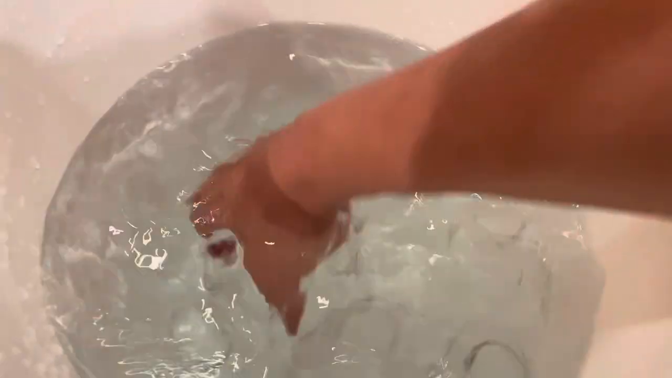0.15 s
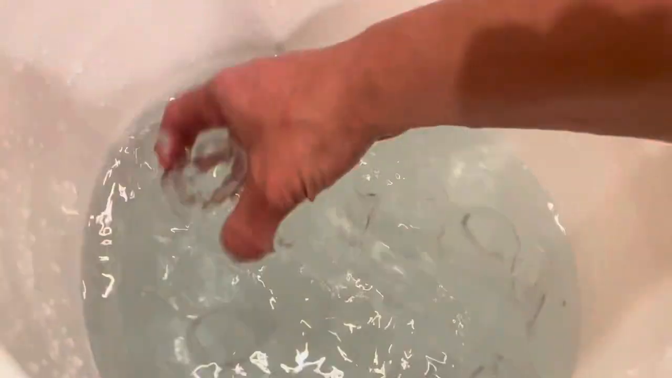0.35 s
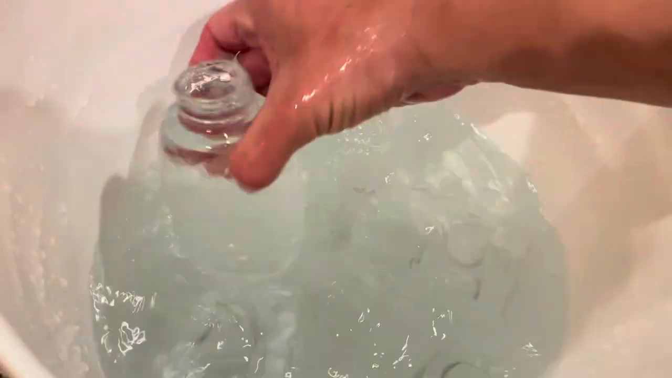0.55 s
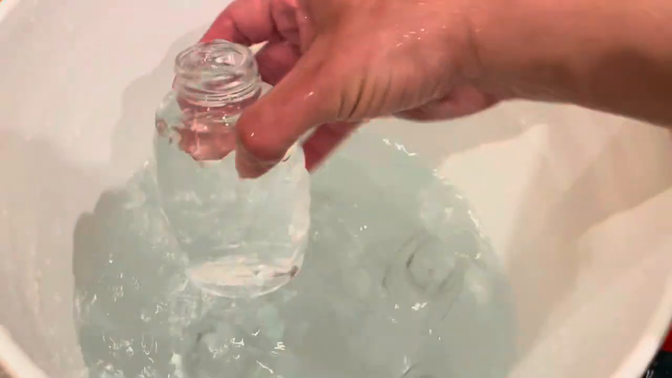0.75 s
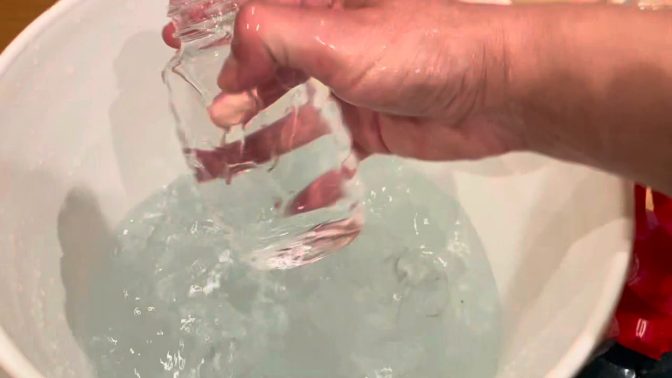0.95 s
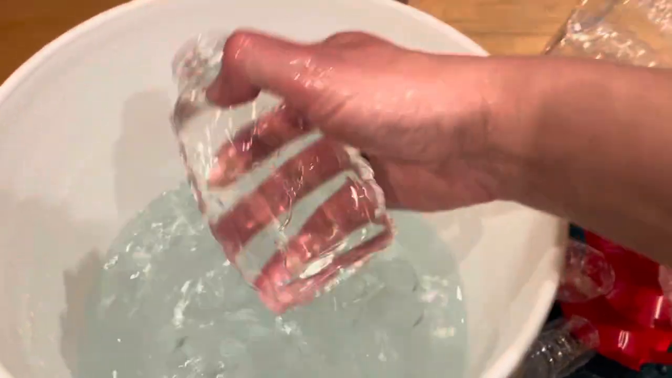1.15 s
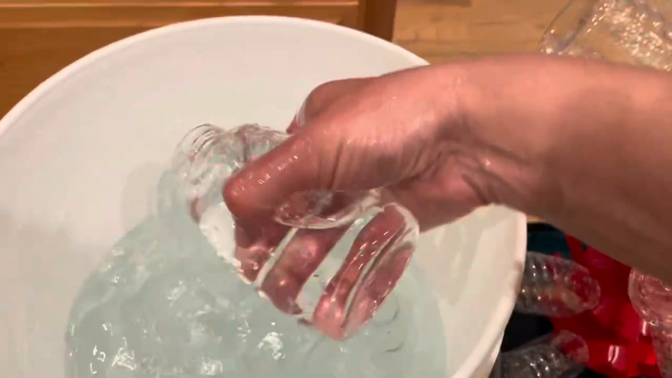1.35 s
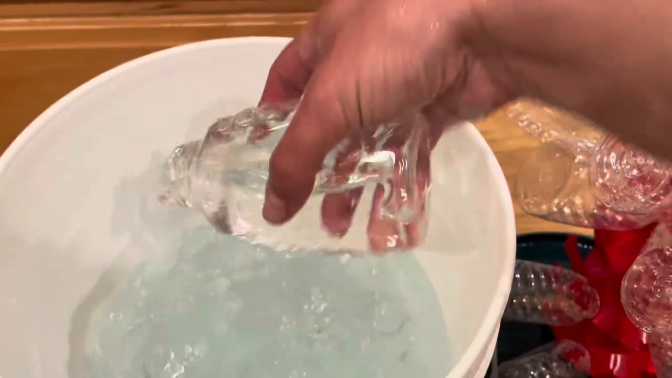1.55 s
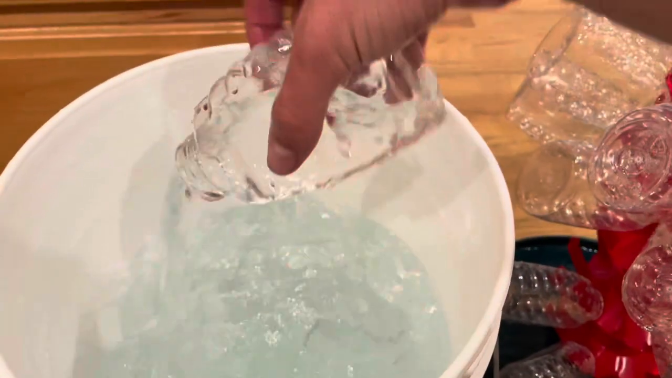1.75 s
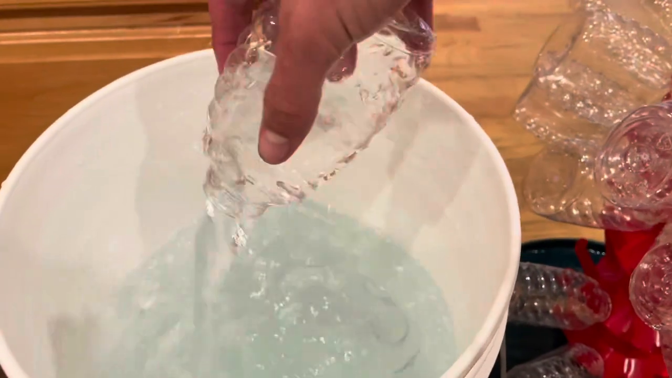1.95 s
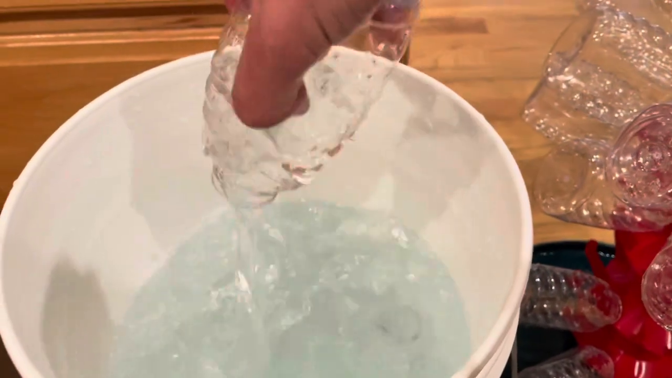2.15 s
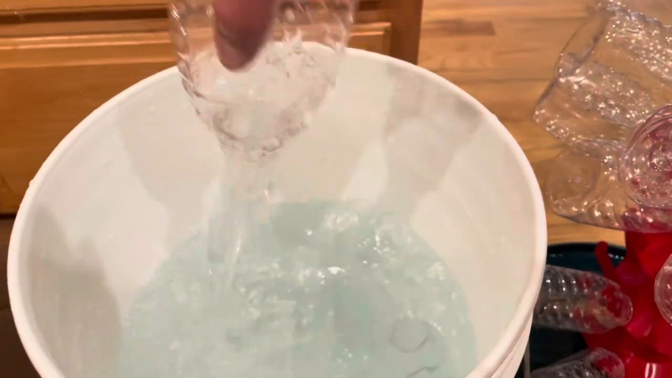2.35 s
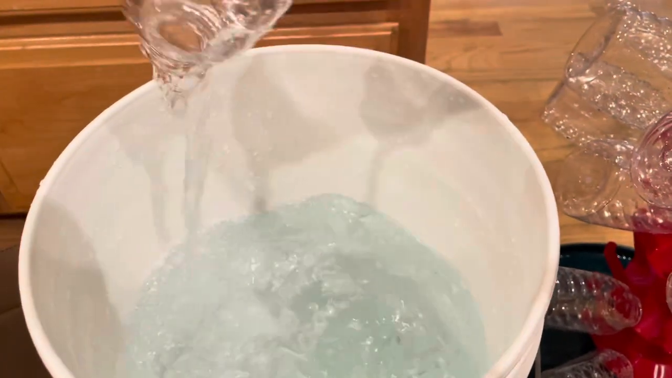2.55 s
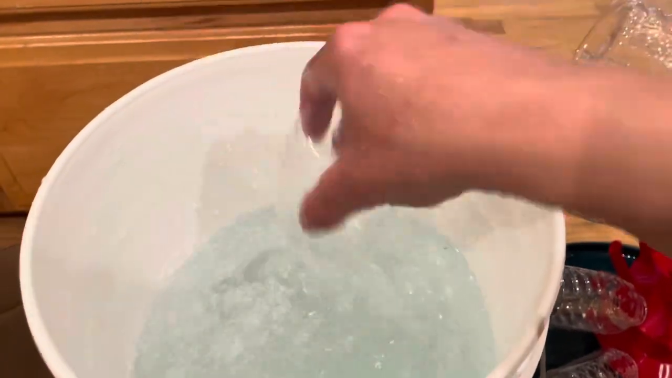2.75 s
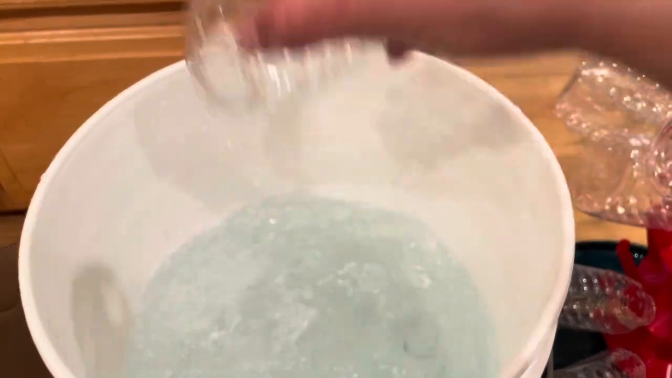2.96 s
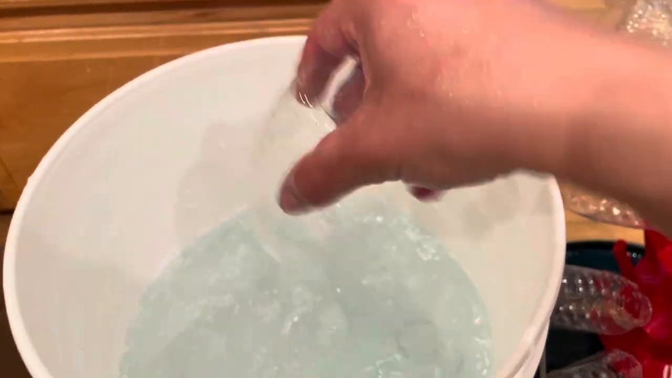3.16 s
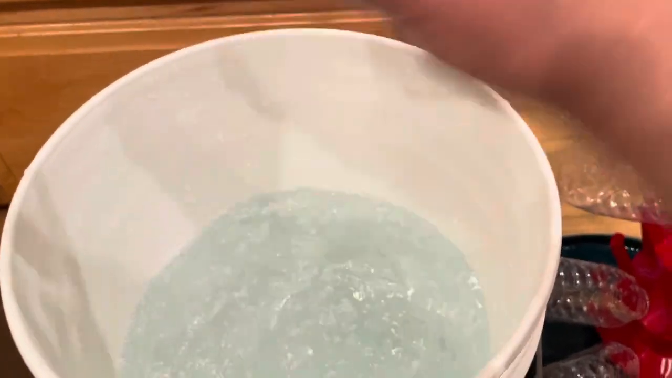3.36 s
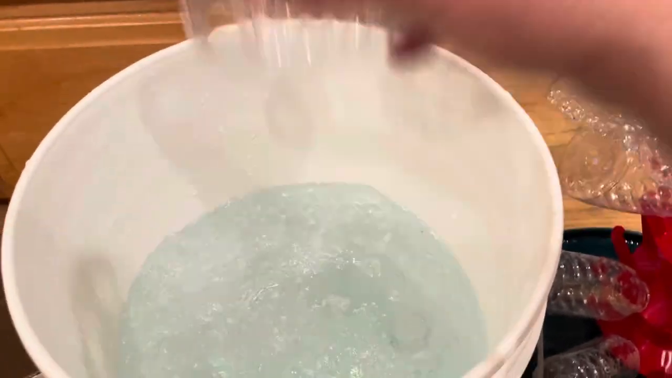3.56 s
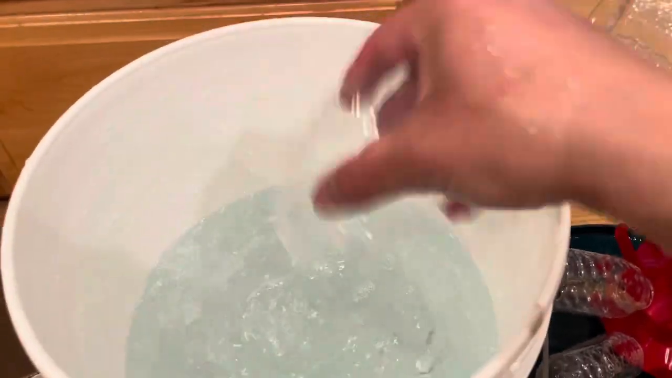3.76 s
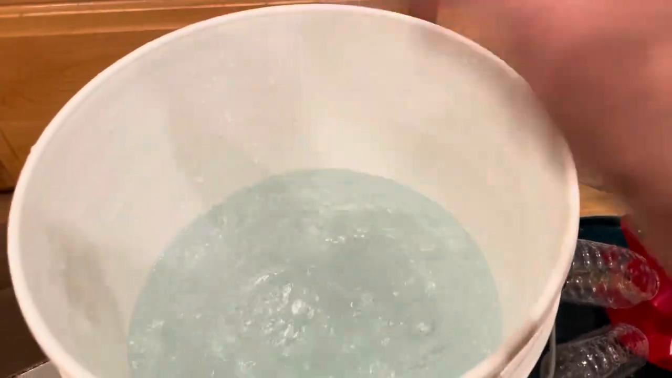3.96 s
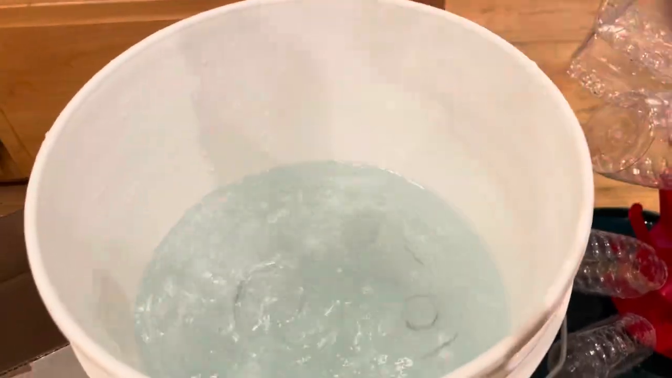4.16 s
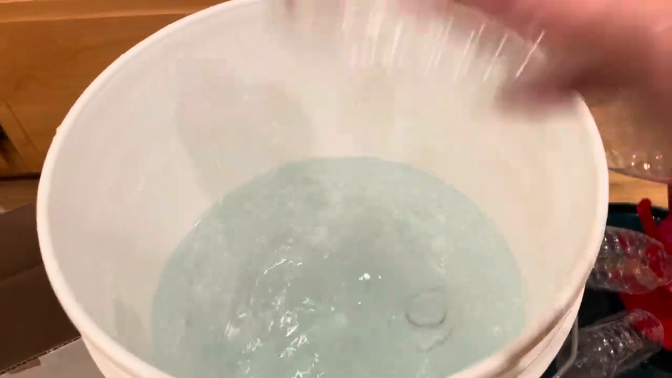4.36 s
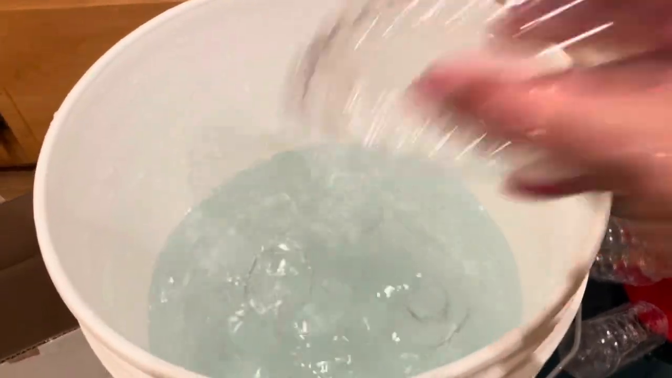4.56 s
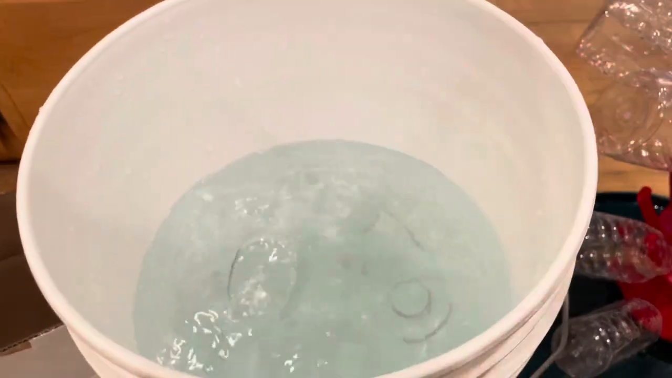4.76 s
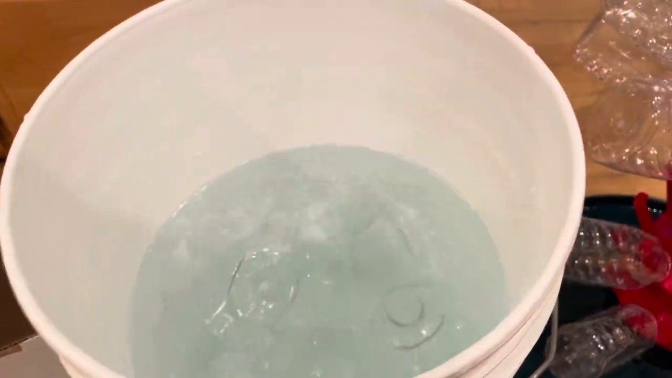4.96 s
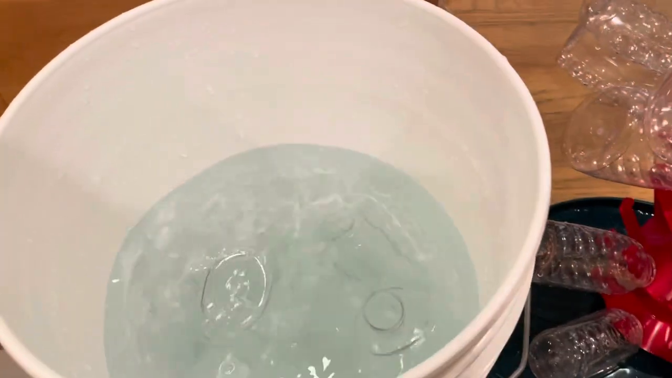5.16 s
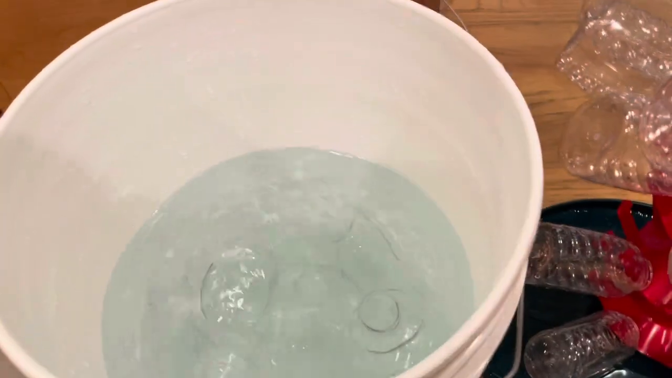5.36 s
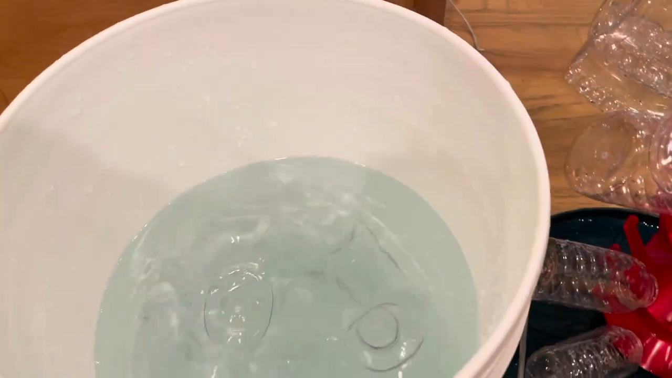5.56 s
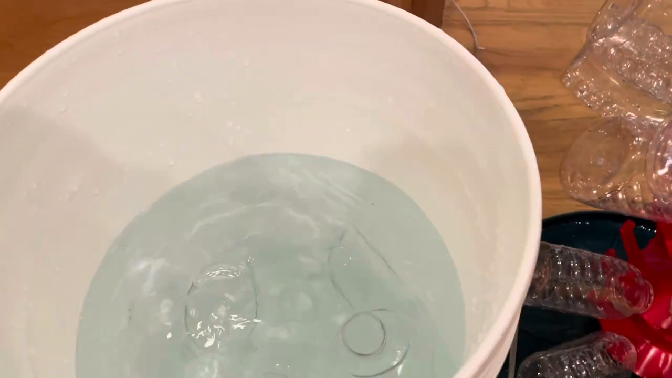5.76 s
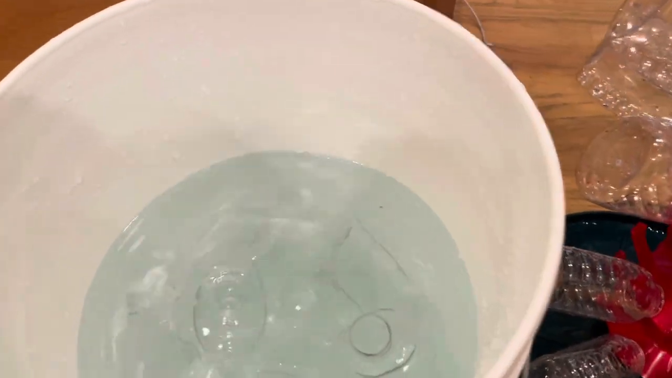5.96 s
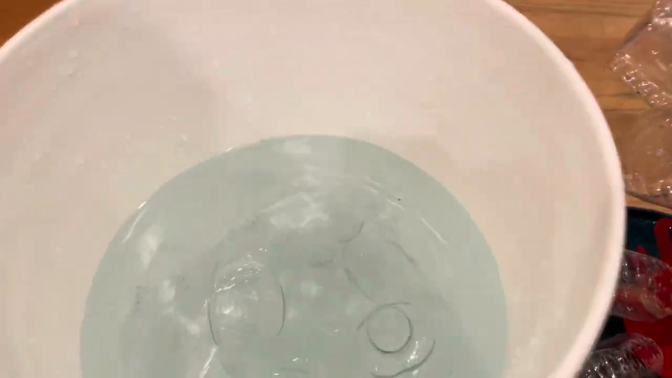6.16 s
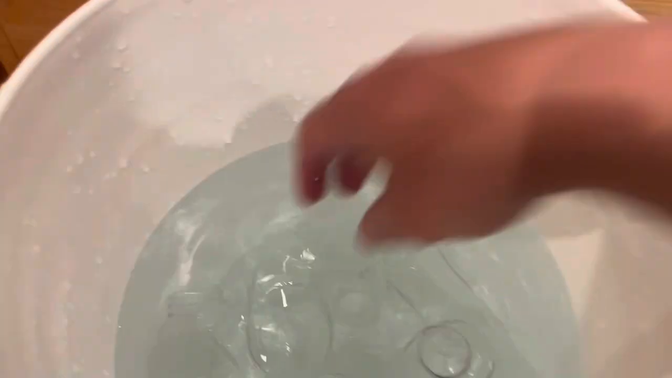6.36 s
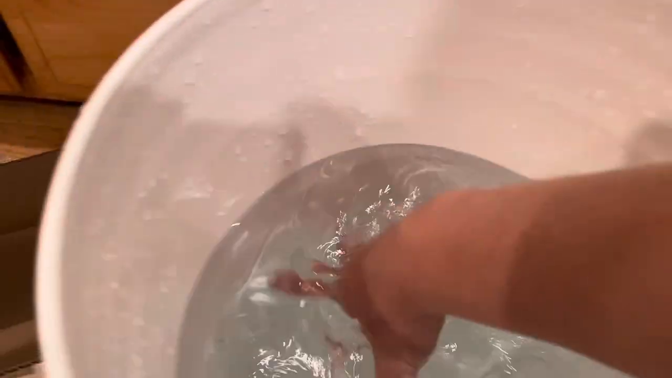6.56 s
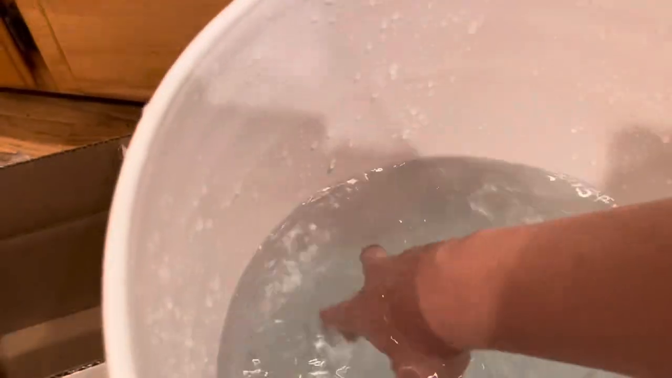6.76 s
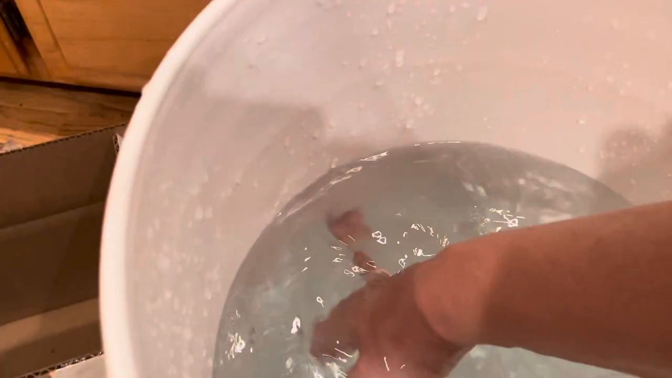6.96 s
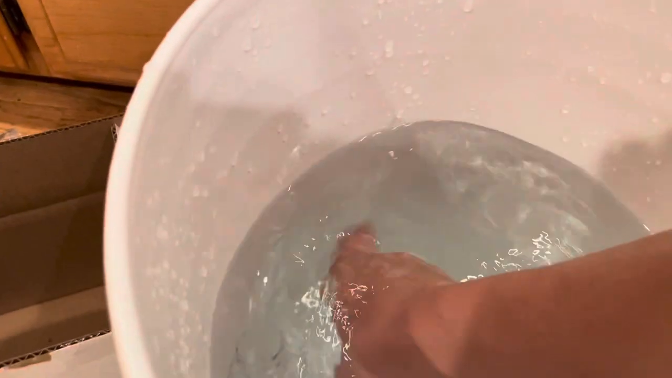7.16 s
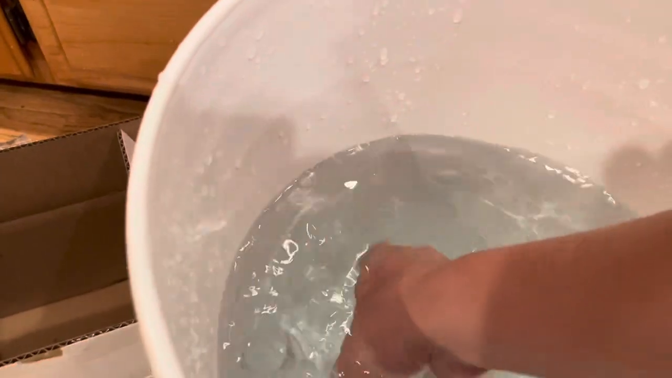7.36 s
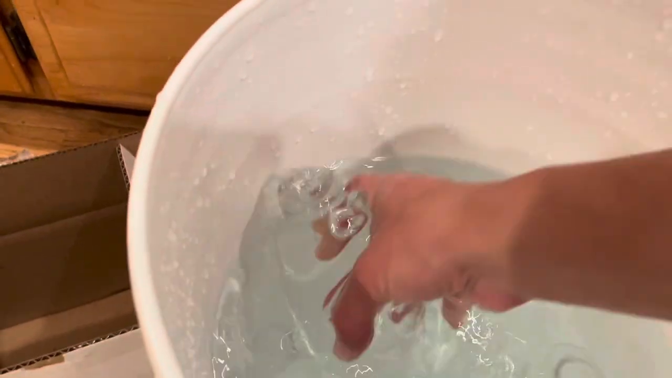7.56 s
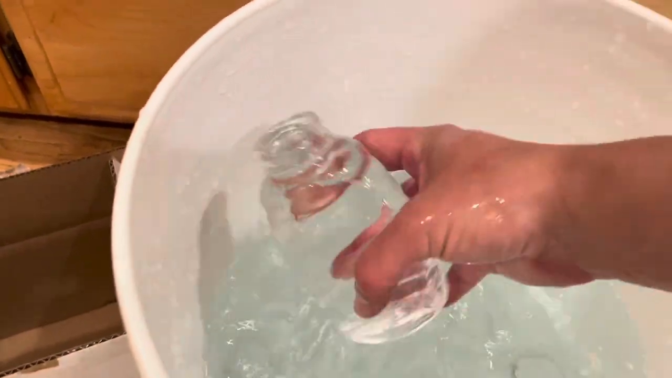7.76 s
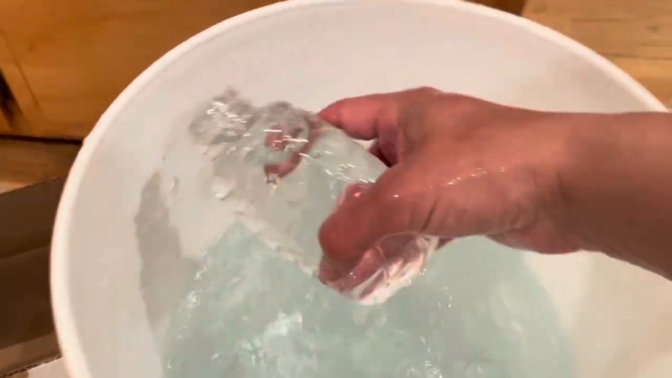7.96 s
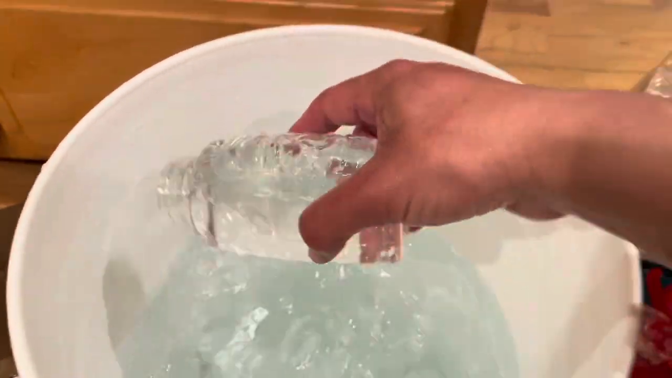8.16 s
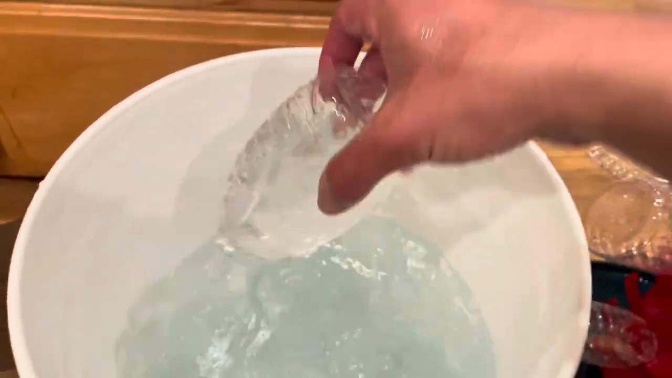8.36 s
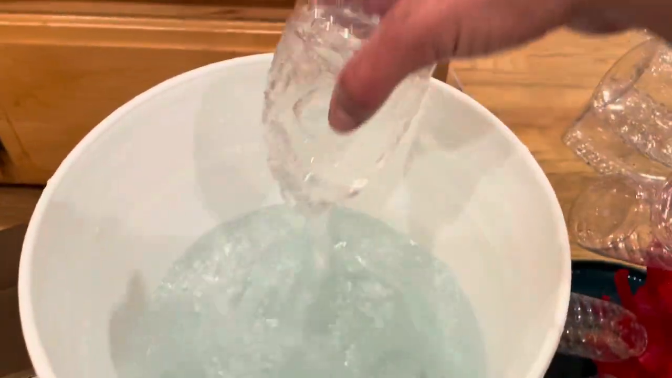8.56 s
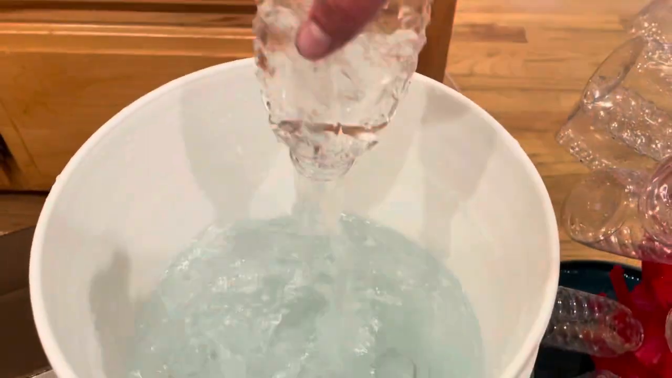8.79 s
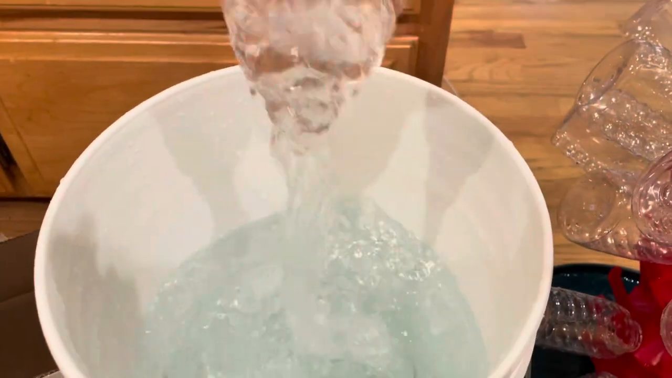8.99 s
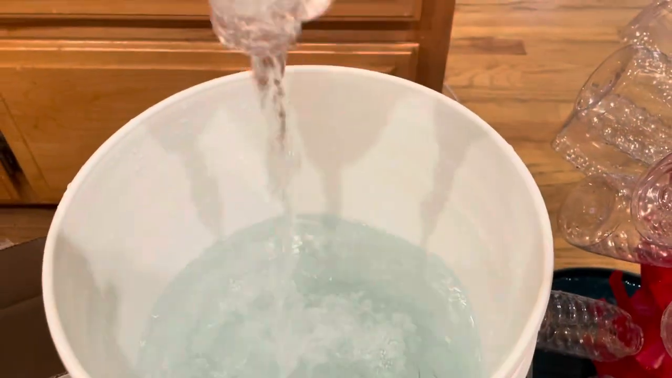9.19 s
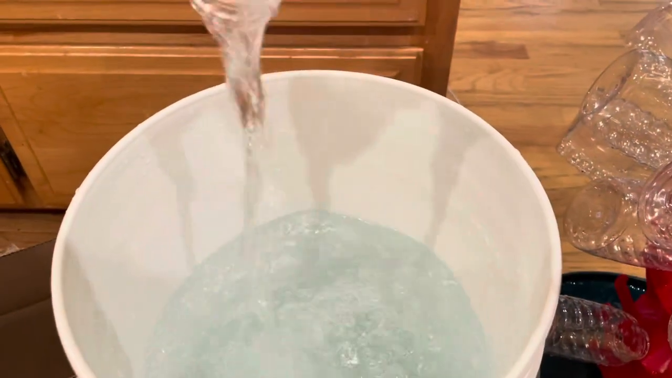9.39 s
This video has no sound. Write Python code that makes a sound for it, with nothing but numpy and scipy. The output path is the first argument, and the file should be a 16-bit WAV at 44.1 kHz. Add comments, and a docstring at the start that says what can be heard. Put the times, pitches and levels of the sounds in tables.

```python
"""A hand rinses small plastic bottles in a bucket of water, close by, over a kitchen's steady hum.
It gropes along the bottom (ringing bucket wall), then a lifted bottle streams (filtered ticks, froth)
and glugs empty (swelling sines). Sharp flicks shake it out: neck modes sink and noise puffs spray.
It is dropped and bounces (noise-struck shell and tray modes). The hand tears the surface (film
crackle), gropes again, and a second bottle glugs empty."""
import sys
import numpy as np
from scipy import signal
from scipy.fft import rfft, irfft, next_fast_len
from scipy.io import wavfile
from scipy.ndimage import uniform_filter1d, map_coordinates

SR = 44100
rng = np.random.default_rng(int(sys.argv[2]) if len(sys.argv) > 2 else 0)


def materialize(psi):
    """Save the field psi as 16-bit PCM at rate SR to the path in sys.argv[1].

    A 1-D psi becomes a single channel; in a 2-D psi each row is a channel.
    """
    bounded = np.clip(np.atleast_2d(psi).T, -1, 1)
    quanta = np.round(bounded * 32767).astype(np.int16)
    wavfile.write(sys.argv[1], SR, quanta)


N = 415863


def amp(db):
    """Decibels to gain."""
    return 10 ** (np.asarray(db) / 20)


def unit(x):
    """Scale to rms 1."""
    return x / np.sqrt(np.mean(x ** 2) + 1e-20)


def along(points, hz):
    """Read (Hz, value) points on a log frequency axis."""
    f, v = np.transpose(points)
    return np.interp(np.log(hz + 1), np.log(f + 1), v)


def lookup(x, points):
    """Read rows of (x, values..) on a linear axis; one result per value column."""
    xs, *columns = np.transpose(points)
    results = [np.interp(x, xs, column) for column in columns]
    return results if len(results) > 1 else results[0]


def level(curves):
    """Gain per sample from several (s, dB) curves, near silent outside them."""
    t = np.arange(N) / SR
    gain = np.zeros(N)
    for curve in curves:
        s, db = np.transpose(curve)
        gain += amp(np.interp(t, s, db, left=-120, right=-120))
    return uniform_filter1d(gain, size=400)


def held(start, end, attack, release):
    """Gain per sample: rises at start, holds until end, then dies away."""
    t = np.arange(N) / SR
    return np.clip((t - start) / attack, 0, 1) * np.exp(-np.clip((t - end) / release, 0, 20))


def add(track, s, sound):
    """Mix a sound in at time s."""
    part = track[max(round(s * SR), 0):][:len(sound)]
    part += sound[:len(part)]


def filtered(x, response):
    """Multiply the spectrum of x by a complex response of frequency."""
    n = x.shape[-1]
    m = next_fast_len(n + 8192)
    return irfft(rfft(x, m) * response(np.fft.rfftfreq(m, 1 / SR)), m)[..., :n]


def coloured(x, spectrum):
    """Shape x by (Hz, dB) gains, at rms 1."""
    return unit(filtered(x, lambda hz: amp(along(spectrum, hz))))


def dulled(x, edge_hz):
    """A gentle second-order low-pass."""
    return filtered(x, lambda hz: 1 / (1 + 1j * np.sqrt(2) * hz / edge_hz - (hz / edge_hz) ** 2))


def resonate(x, modes):
    """Pass x through a body's resonances, summed with alternating sign."""
    def response(f):
        total = 0
        for k, (centre, width, db) in enumerate(modes):
            bandpass = 1j * f * width / (centre * centre - f * f + 1j * f * width)
            total = total + (-1) ** k * amp(db) * bandpass
        return total
    return filtered(x, response)


def swell(u, sharpness=0.67):
    """Rises from u = 0 to 1 at u = 1, then dies away."""
    return (u * np.exp(1 - u)) ** sharpness


def pocket(hz, rise, glide, sharpness=1.74):
    """An air pocket rings while its size, and so its pitch, changes; glide in octaves."""
    u = np.arange(int(8 * rise * SR)) / (rise * SR)
    pitch = hz * 2 ** (glide * np.tanh(u - 1))
    return swell(u, sharpness) * np.sin(2 * np.pi * np.cumsum(pitch) / SR)


def burst(spectrum, rise):
    """A short puff of coloured noise."""
    t = np.arange(SR // 8) / SR
    return coloured(rng.standard_normal(len(t)), spectrum) * swell(t / rise, sharpness=0.94)


def knock(modes, contact, detune=0.0):
    """A scuffing contact, decaying noise, rings a body with modes randomly detuned; peak 1."""
    t = np.arange(SR // 4) / SR
    shifted = [(hz * np.exp(detune * rng.standard_normal()), width, db) for hz, width, db in modes]
    ring = resonate(rng.standard_normal(len(t)) * np.exp(-t / contact), shifted)
    return ring / np.abs(ring).max()


def sizes(count, spread_db):
    """Random gains, mostly small, now and then large."""
    return amp(spread_db * np.minimum(rng.exponential(size=count), 4))


def ticks(rate, spread_db):
    """Random tiny impacts, rate per second."""
    count = int(rate * N / SR)
    where = rng.integers(0, N, count)
    return np.bincount(where, sizes(count, spread_db) * rng.choice([-1, 1], count), N)


def clumps(rate, depth_db):
    """A smooth random gain of rms 1, with rate knots per second."""
    knots = np.clip(rng.standard_normal(int(N * rate / SR) + 4), -2, 2)
    return unit(amp(depth_db * map_coordinates(knots, [np.arange(N) * rate / SR], order=1)))


def froth(rate, centre_hz, scatter, cycles, spread_db, glide=0.053):
    """A cloud of bubbles, each a damped sine of drifting pitch, at rms 1."""
    count = int(rate * N / SR)
    pitch, life, drift = rng.standard_normal((count, 3)).T[:, :, None]
    hz = np.minimum(centre_hz * np.exp(scatter * pitch), SR / 3)
    t = np.arange(SR // 40) / SR
    u = t * hz / (cycles * np.exp(0.24 * life))
    envelope = (1 - np.exp(-6 * u)) * np.exp(-u) * (1 - t / t[-1])
    rings = envelope * np.sin(2 * np.pi * hz * t * (1 + glide * drift * np.tanh(u / 2) / 2))
    rings = rings * sizes(count, spread_db)[:, None]
    where = rng.integers(0, N, (count, 1)) + np.arange(len(t))
    return unit(np.bincount(where.ravel(), rings.ravel(), N)[:N])


# Diffuse sound at the two ports. Each row: frequency in Hz, left-right likeness (1 = identical).
PORT_LIKENESS = [(100, 0.92), (350, 0.59), (700, 0.061), (2000, 0.029), (6000, 0), (8000, 1), (14000, 0.99)]


def diffuse(pair):
    """Blend two unrelated signals as closely spaced ports hear them: alike by frequency."""
    def blend(hz):
        turn = np.arccos(np.clip(along(PORT_LIKENESS, hz), -1, 1)) / 2
        return np.array([np.cos(turn), np.sin(turn)])
    mid, side = filtered(pair, blend)
    return np.array([mid + side, mid - side])


def echoes(x, decay, gap, count=24):
    """Stereo noise-tail reflections, redrawn in count blocks as hand and water move."""
    out, hop = np.zeros((2, N + SR)), N // count + 1
    for start in range(0, N, hop):
        hz, t, z = signal.stft(rng.standard_normal((2, SR // 3)), SR, nperseg=256)
        fade = amp(-60 * t / along(decay, hz)[:, None])
        tail = diffuse(signal.istft(z * fade, SR, nperseg=256)[1])
        wet = signal.fftconvolve(x[None, start:start + hop], tail / np.linalg.norm(tail[0]), axes=1)
        out[:, start + int(gap * SR):][:, :wet.shape[1]] += wet
    return out[:, :N]


# Kitchen hum, with a faint hiss near 12 kHz. Each row: frequency in Hz, gain in dB.
HUM_SPECTRUM = [(18, -39), (30, -12), (53, 3), (70, -7.5), (98, -4), (115, -11), (124, -18), (157, -3.5),
                (189, -7), (259, -17.5), (319, -14), (569, -22.5), (7870, -62), (12000, -51.5),
                (16000, -72.5)]


def humming():
    """Steady noise: the kitchen's hum and a faint high hiss, diffuse at the ports."""
    return amp(-48.5) * diffuse(coloured(rng.standard_normal((2, N)), HUM_SPECTRUM))


# Bottles rubbing along the bucket under water.
# Each row: start in seconds, end in seconds, level at first in dB, easing in dB per second.
GROPES = [(0.0, 0.383, -35.5, 12), (6.457, 7.27, -36.5, 5)]
# A bottle bumping the bucket under water. Each row: start in seconds, level in dB.
BUMPS = [(0.05, -29), (0.108, -24), (0.166, -32), (6.577, -16.5), (6.618, -23.5), (6.647, -20), (6.68, -21),
         (6.754, -24.5), (6.859, -32), (6.982, -25), (7.02, -26), (7.163, -23.5), (7.275, -31.5)]
# Bucket wall resonances. Each row: frequency in Hz, width in Hz, gain in dB.
BUCKET_MODES = [(177, 21.3, -4.5), (316.5, 39, 1.5), (380, 29.3, 0), (760, 45, -10), (1430, 170, -19),
                (1940, 480, -33)]
# Scuffing plastic. Each row: frequency in Hz, gain in dB.
SCUFF_SPECTRUM = [(150, 14.5), (400, -0.5), (1400, 5.5), (2200, -4.5), (3500, -24.5), (6000, -19),
                  (9000, -26.5), (12000, -17), (16000, -43)]
GROPE_ATTACK_S, GROPE_RELEASE_S = 0.002, 0.64
SLIDE_DB, SLIDE_S = -28.5, 0.027  # the bottle slides on: level relative to the bump, fading time


def groping():
    """Submerged bottles scuff and bump in surges; the bucket wall radiates it as a hollow rumble."""
    t = np.arange(N) / SR
    effort = np.zeros(N)
    for start, end, db, easing in GROPES:
        eased_db = db - easing * np.maximum(t - start, 0)
        effort += amp(eased_db) * held(start, end, GROPE_ATTACK_S, GROPE_RELEASE_S)
    for s, db in BUMPS:
        effort += amp(db + SLIDE_DB) * held(s, s, GROPE_ATTACK_S, SLIDE_S)
    rumble = np.zeros(N)
    for mode in BUCKET_MODES:
        rumble += resonate(ticks(rate=2000, spread_db=1), [mode]) * clumps(rate=20, depth_db=3.5)
    rumble = unit(dulled(dulled(rumble, 2300), 2600))
    gurgle = froth(rate=300, centre_hz=1251, scatter=.35, cycles=8, spread_db=3.0, glide=0.16)
    scuff = coloured(ticks(rate=6000, spread_db=5.0), SCUFF_SPECTRUM)
    droplets = froth(rate=500, centre_hz=3200, scatter=.3, cycles=3.5, spread_db=3.5, glide=.1)
    rubbing = amp(-18.0) * gurgle + amp(-36.5) * droplets + amp(-1.0) * rumble + amp(-18) * scuff
    out = effort * clumps(rate=22, depth_db=2.5) * rubbing
    for s, db in BUMPS:
        add(out, s, amp(db) * knock(BUCKET_MODES, contact=0.016))
        add(out, s, amp(db - 36.0) * burst(SCUFF_SPECTRUM, rise=0.0022))  # the surface slops
    return out


# The stream falters between spurts. Each row: centre in seconds, gain in dB.
LULLS = [(1.335, -2.5), (1.395, -5), (1.718, -4), (2.03, -7.5), (2.258, -8), (2.385, -11), (2.635, -7.5),
         (8.22, -6.5), (8.432, -8), (8.598, -7), (9.215, -8.5), (9.283, -6)]
LULL_S = 0.018  # half length


def choking():
    """Gain per sample: bell-shaped dips where the stream falters."""
    t = np.arange(N) / SR
    dip_db = np.zeros(N)
    for s, db in LULLS:
        dip_db += db * np.exp(-np.minimum(((t - s) / LULL_S) ** 2, 20))
    return amp(dip_db)


# Water falling from the lifted bottle, one curve per emptying.
# Each row: time in seconds, flow in dB.
FLOW_CURVES = [
    [(0.3, -69), (0.54, -56.5), (0.78, -72), (0.88, -57), (1.17, -59.5), (1.44, -41.5), (1.6, -40.5),
     (2.28, -43), (2.58, -39.5), (2.81, -63), (2.95, -62.5)],
    [(7.5, -78), (7.618, -58), (7.79, -52.5), (7.87, -69), (8.02, -61), (8.258, -45), (8.31, -41.5),
     (8.504, -41.5), (8.676, -46), (9.43, -43)],
]
# Only heavy runs of drops swell the stream. Each row: run level in dB, share 0-1.
SURGE_SHARE = [(-35.5, 0.01), (-27.5, 0.93)]
# Churned water, slapped water, thrown drops. Each row: frequency in Hz, gain in dB.
CHURN_SPECTRUM = [(30, -27.5), (80, 0.5), (170, -1.5), (330, 9.5), (430, 0.5), (560, -41), (1000, -21.5),
                  (3000, -49.5)]
SMACK_SPECTRUM = [(150, -3), (500, -6), (900, -4.5), (2100, -4), (3300, -11), (5000, -24.5), (9000, -39)]
SPRAY_SPECTRUM = [(300, -28.5), (1200, -6), (3000, -4), (4500, -4), (6500, 3.5), (8500, -1.5), (10000, 4),
                  (12000, 4.5), (13300, -5), (16000, -19)]
# the stream's parts, relative to the flow
CHURN_DB, BUBBLING_DB, GUSH_DB, SPRAY_DB, PLINK_DB, MIST_DB = 2, 0.5, 2, 1, -7, -1.5
SURGE_DB, SURGE_EDGE_S = -11, 0.0046  # relative to the run's own level
DEEP_HZ, DEEP_DB, DEEP_DB_PER_OCTAVE = 700, -3.5, 7.5  # the lower a run ends, the more it churns
DRIP_DB, DRIP_GROWTH = -40.5, 0.39  # drips in a thin flow: level at full-scale flow, power of the flow


def pouring():
    """The stream churns the surface, drives bubbles under and throws spray, in shared spurts."""
    flow, surge, deep = level(FLOW_CURVES) * choking(), np.zeros(N), np.zeros(N)
    for start, end, _, last_hz, db in DROP_RUNS:
        run = amp(db) * lookup(db, SURGE_SHARE) * held(start, end, SURGE_EDGE_S, SURGE_EDGE_S)
        surge += amp(SURGE_DB) * run
        deep += amp(DEEP_DB - DEEP_DB_PER_OCTAVE * np.log2(last_hz / DEEP_HZ)) * run
    spurts = clumps(rate=70, depth_db=2.5)
    low_froth = froth(rate=420, centre_hz=274.7, scatter=0.66, cycles=3.1, spread_db=3.0)
    churn = coloured(low_froth, CHURN_SPECTRUM)
    bubbles = froth(rate=1100, centre_hz=1497, scatter=0.45, cycles=7, spread_db=3.5, glide=.3)
    gush = coloured(ticks(rate=6400, spread_db=4.0), SMACK_SPECTRUM) * clumps(rate=50, depth_db=6.0)
    spray = coloured(ticks(rate=10000, spread_db=3.5), SPRAY_SPECTRUM) * clumps(rate=130, depth_db=7.0)
    plinks = froth(rate=130, centre_hz=4334, scatter=0.2645, cycles=11.0, spread_db=2.0)
    mist = froth(rate=58, centre_hz=10500, scatter=0.26, cycles=3.3, spread_db=6.5)
    drips = froth(rate=34, centre_hz=3650, scatter=.45, cycles=3.8, spread_db=4.5)
    running = flow > amp(-90)
    drip_gain = amp(DRIP_DB) * running * np.abs(flow) ** DRIP_GROWTH
    body = (amp(CHURN_DB) * flow + deep) * churn
    body += (flow + surge) * (amp(BUBBLING_DB) * bubbles + amp(GUSH_DB) * gush)
    top = flow * (amp(SPRAY_DB) * spray + amp(PLINK_DB) * plinks + amp(MIST_DB) * mist)
    return drip_gain * drips + spurts * (body + top)


# Air gulped through the neck, and cavities closing in the bucket.
# Each row: start in seconds, pitch in Hz, level in dB.
GULPS = [(1.253, 337, -21), (1.535, 323.5, -20.5), (1.644, 148.7, -30.5), (1.777, 85.4, -28.5),
         (1.82, 281, -18.5), (1.976, 313, -18.5), (2.097, 406, -20.5), (2.104, 110, -22.5),
         (2.135, 80, -26), (2.155, 148.4, -21), (2.232, 289, -23.5), (2.371, 258, -27), (2.306, 421, -24.5),
         (2.31, 247.4, -12.5), (2.547, 274, -18.5), (2.687, 390, -24.5), (6.49, 477, -32),
         (6.992, 178, -32), (7.171, 188, -35), (7.271, 172, -30), (6.463, 380, -26.5), (7.762, 347, -27),
         (7.782, 327, -24.5), (7.885, 67.7, -25.5), (8.074, 312, -28.5), (8.362, 82.5, -24),
         (8.369, 307, -22), (8.45, 328, -22), (8.455, 83.4, -29.5), (8.574, 86, -32), (8.767, 73, -32.5),
         (8.526, 510, -23), (8.562, 326, -17.5), (8.773, 344, -20.5), (8.969, 330, -26), (9.108, 384, -25),
         (9.2417, 353, -12), (9.258, 201, -21)]
# A hard gulp lets in more air and sinks further. Each row: gulp level in dB, glide in octaves.
GULP_SAG = [(-19, 0.084), (-10, -0.73)]
# Single large bubbles. Each row: start in seconds, pitch in Hz, level in dB.
BUBBLES = [(0.427, 2820, -29), (0.446, 1690, -30.5), (0.525, 924, -28), (0.539, 1020, -27),
           (0.546, 1130, -25.5), (0.632, 3730, -33), (0.7, 2950, -34.5), (0.961, 2600, -37.5),
           (1.102, 2630, -41), (1.187, 1060, -34.5), (1.252, 770, -33.5), (1.291, 880, -41),
           (1.355, 866, -23.5), (1.59, 2610, -21), (1.768, 856, -24), (1.804, 1420, -16.5),
           (1.856, 1350, -27.5), (1.937, 2020, -26), (2.151, 2090, -18), (2.212, 1165, -19.5),
           (2.345, 2020, -24), (2.431, 1910, -22), (2.464, 1390, -22), (2.546, 1390, -25),
           (6.513, 2283, -29.5), (6.571, 3310, -22.5), (6.859, 1580, -34), (7.575, 1640, -38.5),
           (7.621, 2920, -32.5), (7.703, 1165, -35), (7.714, 3100, -38), (7.762, 764, -37),
           (7.817, 897, -27.5), (8.125, 3820, -24), (8.145, 1880, -28), (8.192, 1770, -29.5),
           (8.288, 3070, -22.5), (8.358, 1020, -27), (8.408, 2000, -31), (8.467, 1350, -26),
           (8.522, 843, -25), (8.5256, 1390, -20), (8.526, 1945, -10), (8.71, 2660, -25.5),
           (8.934, 2070, -18), (9.301, 2650, -22), (9.337, 1145, -23.5)]
# Slugs of water slapping the surface. Each row: start in seconds, splash in dB, crack in dB.
SLAPS = [(0.405, -37, -29), (0.4189, -30.5, -26), (0.5817, -35.5, -32), (0.613, -38.5, -25.5),
         (0.673, -49, -32.5), (0.6989, -38.5, -33.5), (1.039, -40, -35), (1.2107, -32.5, -41),
         (1.3224, -34.5, -43), (1.363, -25.5, -34), (1.4182, -33, -42), (1.457, -27, -21),
         (1.4868, -36, -15), (1.652, -31, -15.5), (1.7682, -24, -16), (1.8183, -24, -16.5),
         (1.975, -16.5, -12.5), (2.1502, -25.5, -12), (2.4075, -28, -22), (2.45, -32, -15),
         (2.4815, -46, -10), (2.603, -26.5, -21), (2.6585, -28.5, -28), (6.464, -45.5, -39),
         (6.497, -43, -31.5), (6.569, -35, -23.5), (6.837, -65, -29.5), (6.859, -59, -62),
         (7.6, -43.5, -38.5), (7.786, -42, -33), (7.815, -37.5, -38), (7.939, -35, -19),
         (8.069, -36.5, -29), (8.1185, -31, -25.5), (8.144, -32, -22), (8.4502, -30.5, -27.5),
         (8.5597, -29.5, -10), (8.772, -31, -32.5), (9.087, -29, -7.5), (9.245, -25, -7),
         (9.2997, -34, -13)]
# A light slap has little body. Each row: splash in dB, body in dB.
SLAP_BODY = [(-44.5, -57), (-29.5, -26.5), (-23, -20)]
# Fine splash, sharp crack. Each row: frequency in Hz, gain in dB.
FIZZ_SPECTRUM = [(1200, -24), (3000, 0.5), (4700, 3), (7000, 2.5), (12000, -22.5), (16000, -32.5)]
CRACK_SPECTRUM = [(2500, -32.5), (5500, -22), (8500, 4), (12000, 7.5), (13500, -4), (16000, -18.5)]
GULP_SWELL_S, GULP_SIZE_LAW = 0.0047, 0.41  # swell at 300 Hz, growing with this power of the period
BUBBLE_CYCLES = 3.1  # to full swell
BUBBLE_GLIDE_OCTAVES, BUBBLE_GLIDE_SPREAD_OCTAVES = -0.057, 0.11


def splashes():
    """The large gulps, bubbles and slaps that stand out of the stream; bigger pockets ring longer."""
    out = np.zeros(N)
    for s, hz, db in GULPS:
        rise = GULP_SWELL_S * (300 / hz) ** GULP_SIZE_LAW
        add(out, s, amp(db) * pocket(hz, rise, lookup(db, GULP_SAG)))
    for s, hz, db in BUBBLES:
        glide = rng.normal(BUBBLE_GLIDE_OCTAVES, BUBBLE_GLIDE_SPREAD_OCTAVES)
        add(out, s, amp(db) * pocket(hz, BUBBLE_CYCLES / hz, glide))
    for s, db, crack_db in SLAPS:
        body_db = lookup(db, SLAP_BODY)
        add(out, s, amp(body_db - 3.0) * burst(SMACK_SPECTRUM, rise=0.0016))
        add(out, s, amp(db - 0.5) * burst(FIZZ_SPECTRUM, rise=0.00098))
        add(out, s + 0.00088, amp(crack_db - 4.5) * burst(CRACK_SPECTRUM, rise=0.00037))
    return out


# Runs of drops and bubbles, as water streams off the bottle, out of its neck or round the hand.
# Each row: start in seconds, end in seconds, first pitch in Hz, last pitch in Hz, level in dB.
DROP_RUNS = [(0.408, 0.457, 2790, 1660, -37.5), (0.522, 0.573, 840, 1390, -33),
             (0.574, 0.605, 1920, 2580, -46.5), (0.876, 0.92, 1600, 1470, -47.5),
             (1.067, 1.109, 1660, 2970, -50), (1.129, 1.219, 2060, 890, -49),
             (1.448, 1.496, 2640, 1950, -28.5), (1.508, 1.60, 1480, 1130, -31),
             (1.761, 1.785, 910, 1530, -28), (1.775, 1.829, 2620, 1880, -29.5),
             (1.858, 1.946, 1250, 2065, -33), (2.054, 2.14, 1120, 696, -28), (2.187, 2.2, 1500, 1400, -38),
             (2.46, 2.49, 1410, 2000, -33), (2.513, 2.587, 2130, 1400, -32),
             (2.657, 2.684, 1300, 1700, -28.5), (6.498, 6.529, 2880, 2510, -42),
             (6.569, 6.596, 1210, 1900, -37), (6.639, 6.677, 2200, 1600, -43.5),
             (6.735, 6.775, 2220, 1590, -45.5), (6.896, 6.935, 1370, 2100, -51),
             (6.973, 7.059, 1930, 1310, -51), (7.315, 7.391, 1900, 1400, -51),
             (7.553, 7.684, 1450, 2300, -46), (7.69, 7.766, 1920, 2900, -50.5),
             (7.904, 8.053, 1800, 890, -50), (8.169, 8.194, 2300, 3000, -36.5),
             (8.233, 8.273, 1300, 1700, -29.5), (8.27, 8.335, 2000, 1360, -28.5),
             (8.351, 8.413, 1090, 2110, -35), (8.466, 8.484, 1350, 2000, -26),
             (8.611, 8.729, 2050, 2480, -32.5), (8.766, 8.805, 1870, 1050, -31.5),
             (8.876, 8.928, 2520, 2060, -36), (8.959, 8.993, 2240, 1710, -32.5),
             (9.021, 9.06, 1150, 2180, -31), (9.077, 9.12, 1900, 2170, -29),
             (9.162, 9.202, 2680, 2000, -35.5), (9.299, 9.324, 2760, 1770, -30.5),
             (9.355, 9.384, 1460, 2130, -27)]


def dribbling():
    """A thread breaks into a quick run of drops whose pitch slides as the bottle moves."""
    out = np.zeros(N)
    for start, end, first_hz, last_hz, db in DROP_RUNS:
        count = int((end - start) * 220)
        scatter = np.interp(db, [-46, -36], [.03, .14])  # a thin thread sheds even drops, a gush uneven
        rise = np.interp(db, [-46, -32], [.0032, .0017])  # crowded bubbles ring more briefly
        glide = 0.15 * np.sign(last_hz - first_hz)
        for k, (late, detune, size) in enumerate(rng.standard_normal((count, 3))):
            share = k / count
            hz = first_hz * (last_hz / first_hz) ** share * np.exp(scatter * detune)
            s = start + share * (end - start) + 0.0024 * late
            add(out, s, amp(db - 1.5 + 2 * size) * pocket(hz, rise, glide))
    return out


PATTER_DB, PATTER_RISE_S, PATTER_FADE_S = -15.5, 0.042, 0.035  # relative to the flick or swish
FOAM_S, FOAM_DB, FOAM_FADE_S = 2.36, -56.5, 0.65  # foam left by the first emptying keeps bursting


def pattering():
    """Foam crackles as it fades; drops land after every flick and swish."""
    drizzle = amp(8.5) * coloured(ticks(rate=5000, spread_db=7.0), SPRAY_SPECTRUM)
    drizzle += amp(1.0) * coloured(ticks(rate=2700, spread_db=2.0), SMACK_SPECTRUM)
    drops = amp(-5.0) * froth(rate=160, centre_hz=1810, scatter=0.56, cycles=3.4, spread_db=6.5)
    throws = [(s, spray_db) for s, *_, spray_db in FLICKS] + [(s, db) for s, db, _ in SWISHES]
    gain = amp(FOAM_DB) * held(FOAM_S, FOAM_S, PATTER_RISE_S, FOAM_FADE_S)
    for s, db in throws:
        gain += amp(db + PATTER_DB) * held(s, s, PATTER_RISE_S, PATTER_FADE_S)
    return gain * (drizzle + drops) * clumps(rate=45, depth_db=4.0)


# Flicks of the nearly empty bottle.
# Each row: start in seconds, neck in dB, gulp in dB, gulp pitch in Hz, spray in dB.
FLICKS = [(2.708, -25.5, -8, 384, -27), (3.114, -34.5, -21, 358, -38), (3.411, -34.5, -20, 400, -39),
          (3.710, -33, -32.5, 350, -41.5), (3.98, -28, -23, 353, -46), (4.238, -30, -24.5, 352, -39),
          (4.471, -32.5, -28.5, 380, -44)]
# More water gulps sooner and longer. Each row: gulp in dB, delay in seconds, swell in seconds.
FLICK_GULP = [(-13.5, 0.0098, 0.0085), (-7, 0.0015, 0.012)]
# Air in the bottle. Each row: frequency in Hz, gain in dB, swell in seconds.
NECK_MODES = [(807, 5, 0.0068), (1346, -6.5, 0.0028), (1865, -4, 0.0088), (2785, -13.5, 0.0061),
              (3490, -16, 0.0071)]
# Hollow bottle. Each row: frequency in Hz, width in Hz, gain in dB.
CAVITY_MODES = [(375, 41, -1), (716, 200, 1.5), (1340, 220, -3.5), (1760, 220, -1.5), (3040, 470, -13),
                (4170, 770, -11.5), (11600, 700, -13.5)]
# The last water swishing round inside. Each row: start in seconds, level in dB, swell in seconds.
SWISHES = [(3.47, -55, 0.0046), (3.895, -53, 0.0052), (4.17, -49.5, 0.0088), (4.417, -43.5, 0.0038),
           (4.607, -45.5, 0.011), (4.693, -44, 0.012), (4.794, -48.5, 0.0049)]


def thrown_water(rise, smack_rise):
    """A puff of spray with a stronger, duller smack."""
    return burst(SPRAY_SPECTRUM, rise) + amp(5.0) * burst(SMACK_SPECTRUM, smack_rise)


def shaking():
    """Each flick drives water down the neck: air modes sink, air gulps back in and drops scatter."""
    out = np.zeros(N)
    for s, neck_db, gulp_db, gulp_hz, spray_db in FLICKS:
        # water rushing along the wall, then the neck clears
        add(out, s - .022, amp(spray_db - 15.5) * thrown_water(rise=0.02, smack_rise=.018))
        add(out, s - .004, amp(neck_db - 9.5) * pocket(976, rise=0.0065, glide=-0.02))
        for hz, db, rise in NECK_MODES:
            gain = amp(neck_db - 3.0 + db + rng.normal(0, 2.3))
            add(out, s + 0.00352, gain * pocket(hz * rng.normal(1, 0.018), rise, glide=-0.072))
        delay, gulp_rise = lookup(gulp_db, FLICK_GULP)
        gulp = pocket(gulp_hz, gulp_rise, glide=-0.085, sharpness=4.76)
        add(out, s + delay, amp(gulp_db) * gulp)
        # thrown water hits the bucket, and spatter rings the hollow bottle
        add(out, s, amp(gulp_db - 11.0) * knock(BUCKET_MODES, contact=0.01, detune=.04))
        add(out, s + .003, amp(spray_db - 3.0) * thrown_water(rise=0.0035, smack_rise=0.0041))
        add(out, s + 0.006, amp(neck_db + 2.0) * knock(CAVITY_MODES, contact=0.008, detune=.03))
    for s, db, rise in SWISHES:
        t = np.arange(int(8 * rise * SR)) / SR
        swish = unit(resonate(rng.standard_normal(len(t)), CAVITY_MODES))
        add(out, s, amp(db) * swish * swell(t / rise))
    return out


# The dropped bottle's contacts as it bounces and rocks.
# Each row: start in seconds, thud in dB, clack in dB, clack's low-pass edge in Hz.
BOUNCES = [(5.534, -33, -24.5, 3280), (5.548, -24, -34, 1700), (5.57, -27, -28, 1410),
           (5.589, -47, -36, 1790), (5.636, -25.5, -15, 7480), (5.646, -25.5, -28, 5050),
           (5.657, -40, -29, 5000), (5.694, -29, -44.5, 2800), (5.706, -35, -45, 2500),
           (5.757, -39, -29, 2510), (5.832, -38, -48, 1500), (5.873, -26, -29.5, 5000),
           (5.905, -31, -29.5, 3830), (5.939, -32, -37, 3500), (5.996, -35, -37, 2980),
           (6.107, -32.5, -40.5, 2600), (6.181, -35, -56, 1200)]
# Tray, then empty bottle shell. Each row: frequency in Hz, width in Hz, gain in dB.
TRAY_MODES = [(131.5, 16.7, 4), (202, 77, -3.5), (334.6, 25, 6.5), (704, 87, -8.5), (824, 38, -4),
              (1070, 350, -19.5), (1842, 136, -12)]
SHELL_MODES = [(770, 110, 2), (1190, 300, 0), (1420, 187, 5), (1860, 240, 1.5), (3070, 590, -1),
               (3830, 440, 2), (4310, 340, 1.5), (7250, 690, -11), (12200, 1500, -17)]


def dropping():
    """The empty bottle clacks on its thin shell and thuds on the tray; soft contacts sound duller."""
    out = np.zeros(N)
    for s, thud_db, clack_db, edge_hz in BOUNCES:
        add(out, s, amp(thud_db) * knock(TRAY_MODES, contact=0.0058, detune=0.032))
        clack = knock(SHELL_MODES, contact=0.0037, detune=.05)
        add(out, s, amp(clack_db) * dulled(clack, edge_hz))
        snap = burst(SPRAY_SPECTRUM, rise=0.002)  # of the thin wall
        add(out, s, amp(clack_db - 14.0) * dulled(snap, edge_hz))
    return out


# The hand moves through the surface. Each row: start in seconds, end in seconds, level in dB.
WASHES = [(6.339, 6.46, -65), (6.451, 6.528, -49.5), (6.585, 6.655, -59), (7.307, 7.41, -67)]
# Tearing water film. Each row: frequency in Hz, gain in dB.
FILM_SPECTRUM = [(1000, -1), (3000, -3), (7000, -4.5), (9000, -2), (11500, 3), (13500, -3.5),
                 (16000, -15.5)]
WASH_RISE_S, WASH_FADE_S = 0.022, 0.022


def washing():
    """The hand breaks the surface and tears a film of water into tiny crackling drops."""
    wash = sum(amp(db) * held(start, end, WASH_RISE_S, WASH_FADE_S) for start, end, db in WASHES)
    film = coloured(ticks(rate=2300, spread_db=4.0), FILM_SPECTRUM)
    return wash * film * clumps(rate=100, depth_db=5.0)


WANDER_PER_S, WANDER_DB, WANDER_HZ = 70, -5, 500  # rate, reach, pitch above which it shows


def wandering(x):
    """Splashes land all over the bucket, so their lead between the ports keeps shifting."""
    count = int(WANDER_PER_S * N / SR) + 2
    spots = rng.uniform(-0.81, 1, count)
    spot = np.interp(np.arange(N) / N, np.linspace(0, 1, count), spots)
    quarter_turn = filtered(x, lambda hz: 1j * hz / (hz + WANDER_HZ))
    return amp(WANDER_DB) * np.array([[1], [-1]]) * spot * quarter_turn


# The bucket at the two ports. Each row: frequency in Hz, left over right in dB.
PORT_BALANCE = [(100, 3.5), (330, 0.5), (700, 7.5), (1500, 5), (3000, 4.5), (6000, 1), (9000, 0)]
# Each row: frequency in Hz, left lead in turns.
PORT_LEAD = [(100, -0.05), (800, 0.092), (2400, 0.2), (5100, -0.078), (5800, -0.22), (8400, -0.454),
             (13200, -0.96), (16000, -1.1)]


def at_ports(pair):
    """Sound from the bucket is louder on the left and out of step between the ports."""
    side = np.array([[.5], [-.5]])

    def response(hz):
        gain = amp(side * along(PORT_BALANCE, hz))
        return gain * np.exp(2j * np.pi * side * along(PORT_LEAD, hz))
    return filtered(pair, response)


# Reverberation of room and bucket. Each row: frequency in Hz, 60 dB decay time in seconds.
ROOM_DECAY = [(150, 0.7), (1000, 0.42), (5000, 0.38), (14000, 0.13)]
BUCKET_DECAY = [(150, 0.19), (1000, 0.036), (4000, 0.048), (14000, 0.017)]
CEILING_S, CEILING_DB, CEILING_HZ = .0185, -12.5, 517  # one low echo: delay, level, upper edge


def scene():
    """Water in the bucket, the dropped bottle farther off to one side, and the kitchen's hum."""
    hum = humming()
    water = groping() + pouring() + splashes() + dribbling() + pattering() + shaking() + washing()
    short_waves = filtered(water, lambda hz: hz ** 2 / (hz ** 2 + 450 ** 2))  # only these scatter
    near = water + wandering(water)
    near += amp(-3.5) * echoes(short_waves, BUCKET_DECAY, gap=.0006, count=72)
    near += amp(-14.0) * echoes(short_waves, ROOM_DECAY, gap=.008)
    near += amp(CEILING_DB) * np.pad(dulled(water, CEILING_HZ), (int(CEILING_S * SR), 0))[:N]
    bottle = dropping()
    delay_s = np.array([[.00019], [0]])  # left, right
    far = filtered(bottle, lambda hz: np.exp(-2j * np.pi * hz * delay_s))
    far += amp(-4.0) * echoes(bottle, ROOM_DECAY, gap=0.0037, count=48)
    return at_ports(near) + far + hum


TOP_HZ = 15800


def record(dry):
    """The microphone sheds the deepest bass; nothing is kept above the band limit."""
    bass_cut = signal.sosfilt(signal.butter(4, 36, "high", fs=SR, output="sos"), dry)
    return filtered(bass_cut, lambda hz: hz < TOP_HZ)


dry = scene()
out = record(dry)
materialize(out)
```